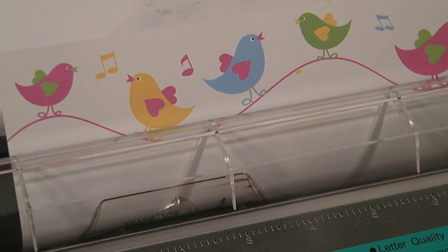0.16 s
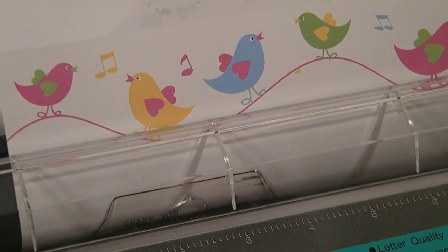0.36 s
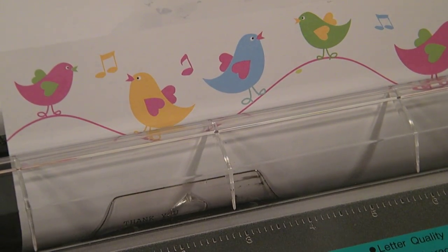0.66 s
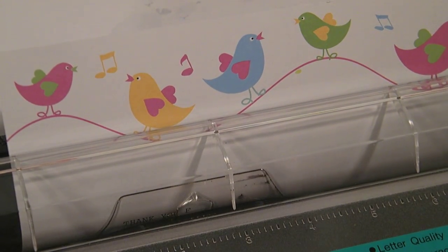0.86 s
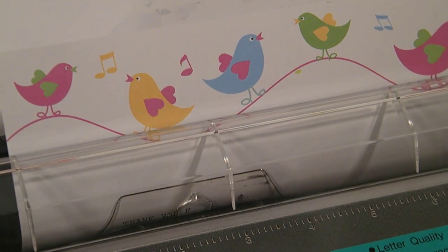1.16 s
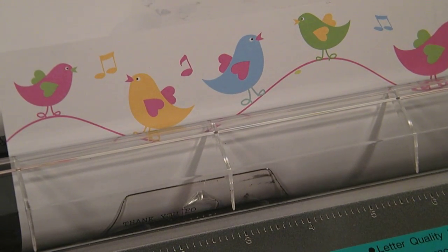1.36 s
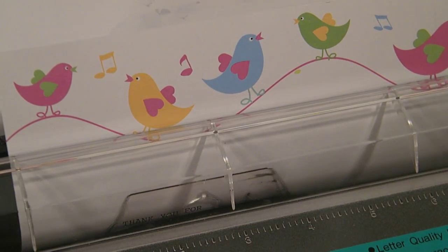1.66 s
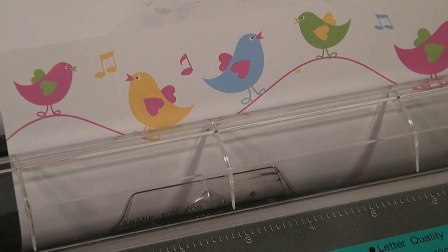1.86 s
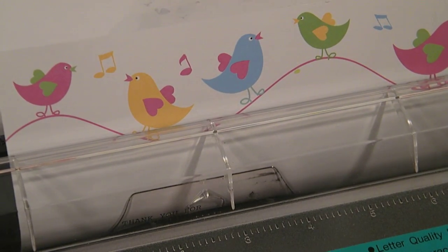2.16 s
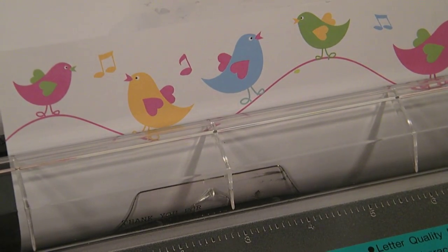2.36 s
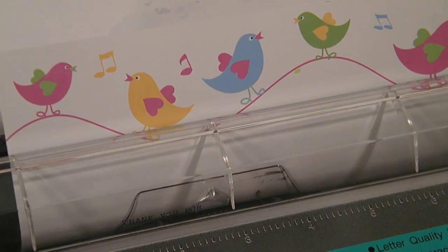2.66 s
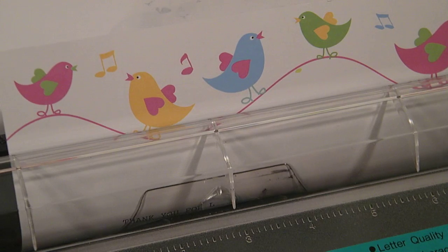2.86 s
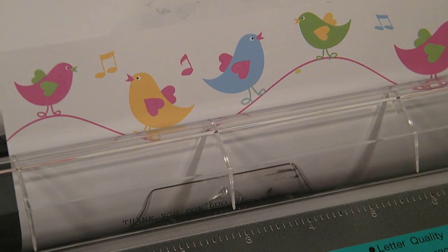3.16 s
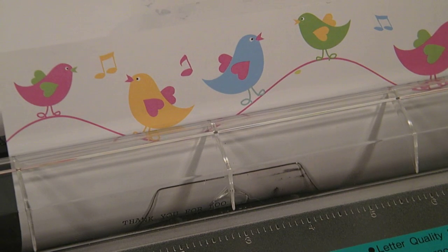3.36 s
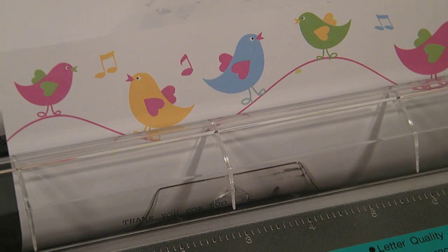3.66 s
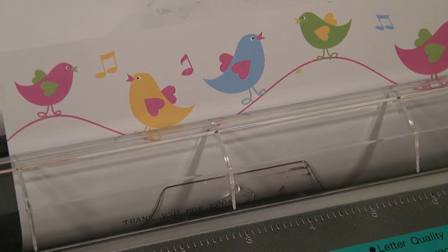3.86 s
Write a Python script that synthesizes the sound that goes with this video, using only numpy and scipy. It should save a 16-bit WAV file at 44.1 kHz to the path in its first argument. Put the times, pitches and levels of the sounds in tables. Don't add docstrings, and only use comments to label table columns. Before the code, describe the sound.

Typewriter keys clack one by one, each answered by a whir and a hard, rattling strike

```python
import sys
import numpy as np
from scipy import signal
from scipy.fft import rfft, irfft
from scipy.io import wavfile
from scipy.ndimage import uniform_filter1d

SR = 44100
rng = np.random.default_rng(int(sys.argv[2]) if len(sys.argv) > 2 else 0)


def makeup_ratio(level_db):
    decades = np.asarray(level_db, float) / 20
    return 10 ** decades


def digitize_waveform(pressure):
    field = np.atleast_2d(pressure).T
    bounded = np.clip(field, -1, 1)
    quanta = np.round(bounded * 32767).astype(np.int16)
    wavfile.write(sys.argv[1], SR, quanta)


N = 176400

# frequency in Hz, level in dB per Hz.
RUMBLE_SPECTRUM = [(30, -15.5), (60, 0), (114, -19), (183, -9), (240, -11.5), (436, -16), (1210, -27),
                   (1500, -61)]
# frequency in Hz, level in dB per Hz.
HISS_SPECTRUM = [(590, -13), (1000, 1.5), (4760, -7.5), (6020, 1), (7350, -8), (7970, -8), (8550, -19),
                 (15700, -27), (15900, -45.5)]
# frequency in Hz, level in dB, flutter in dB.
COIL_WHINE = [(7732, -57.5, .5), (15466, -87, 2.5), (15735, -85, 2.5)]
# time in seconds, level in dB.
HUM_LEVEL = [
    (0, -49.5),
    (1.948, -68),
    (2.05, -50.5),
    (3.0, -49),
    (3.55, -45),
    (3.8, -51),
    (4, -59),
]
# start in seconds, length in seconds, top in Hz, fall in Hz, level in dB.
BIRD_WHISTLES = [
    (.46, 0.11, 10400, 1300, -73),
    (0.554, 0.034, 9100, 200, -66),
    (1.996, 0.13, 9650, 1300, -70),
    (2.122, 0.044, 9220, 97.4, -65),
    (2.137, 0.19, 8950, 460, -62),
    (2.396, .17, 9040, 1130, -63),
]
RUMBLE_DB, HISS_DB, HUM_HZ = -47, -56, 88.7
ROOM_T60_S, ROOM_WET_DB, WALL_CUT_HZ = .3, -24, 7000

# start in seconds, level in dB.
LINKAGE_SCRAPES = [
    (0.413, -33),
    (2.39, -34),
]

# motor start in seconds, level in dB.
CARRIAGE_STEPS = [(0.017, -41.5), (0.266, -40.5), (0.352, -35), (0.886, -39.5), (1.313, -41.5),
                  (1.747, -41), (2.34, -33), (2.901, -41.5), (3.106, -40.5), (3.267, -40), (3.8, -40)]
# frequency in Hz, level in dB, delay in seconds, attack in seconds, hold in seconds, T60 in seconds.
FRAME_MODES = [(383.6, 3, 0.0018, 0.0009, 0.027, 0.15), (717, -3.5, 0.00087, 0.0017, 0.032, 0.028),
               (649, -3.5, 0, 0.0022, 0.029, 0.27), (147, -1, 0.00022, 0.012, 0.027, 0.38),
               (56.4, -3, 0.011, 0.031, 0.043, 0.092)]

# start in seconds, length in seconds, level in dB.
WHEEL_TURNS = [(-.02, 0.019, -32), (0.127, 0.073, -28), (0.672, 0.075, -29), (1.149, 0.065, -25.5),
               (1.608, 0.071, -25.5), (2.37, 0.028, -30), (2.739, 0.07, -25.5), (2.987, 0.091, -27.5),
               (3.143, 0.15, -31), (3.648, 0.066, -24.5), (3.858, 0.069, -26.5)]
# start in seconds, level in dB.
TOOTH_CATCHES = [(0.1333, -19.5), (0.1486, -27), (0.156, -19), (0.166, -23), (0.1775, -24), (0.19, -19),
                 (0.686, -20), (0.6923, -18.5), (0.7016, -23), (0.7156, -20.0), (0.727, -22.0),
                 (0.735, -22.5), (1.1544, -37), (1.1668, -33), (1.1754, -36), (1.19, -27.5), (1.2017, -22),
                 (1.21, -28), (1.617, -29), (1.6313, -28), (1.6421, -22), (1.655, -27), (1.664, -33),
                 (1.6743, -25.0), (2.748, -23.5), (2.7607, -28), (2.7715, -23), (2.7845, -21),
                 (2.794, -16.5), (2.801, -19), (2.9946, -28), (3.005, -18.5), (3.0099, -19.0), (3.021, -20),
                 (3.03, -31), (3.045, -26), (3.157, -21), (3.167, -26), (3.179, -28), (3.19, -22.0),
                 (3.2023, -17.5), (3.6488, -18.5), (3.6722, -15.5), (3.6876, -23), (3.6946, -25),
                 (3.7015, -26), (3.862, -27), (3.8791, -24), (3.8894, -23.5), (3.9035, -28), (3.9228, -32)]
# frequency in Hz, level in dB per Hz.
WHIR_SPECTRUM = [(730, -0.5), (1150, -15.5), (4400, -7.5), (5400, 0.5), (6800, 2), (8500, -7), (12000, -20),
                 (15500, -29), (16600, -48)]

# start in seconds, peak in dB.
KEY_TICKS = [(0.0044, -41), (0.095, -7), (0.3325, -4), (0.4, -17.5), (0.418, -15), (0.43, -16),
             (0.6447, -5.5), (1.1232, -14.5), (1.584, -8), (2.3013, -3.5), (2.3655, -21), (2.3981, -17.5),
             (2.7144, -17), (2.9512, -14.5), (3.6194, -10)]
# frequency in Hz, level in dB per Hz.
TICK_SPECTRUM = [(410, -68), (700, -32), (1770, -5), (3240, -10.5), (3800, -12), (4580, -4), (5960, 7),
                 (14500, -33), (16500, -89)]
# start in seconds, peak in dB, darkness in dB per octave, desk level in dB.
KEY_PRESSES = [
    (0.106, -16.5, -8, -15),
    (0.3399, -4, -10, 0.5),
    (0.6513, -15, 17, -6.5),
    (1.1300, -7, -15, -8),
    (1.5933, -13.5, 16, -21),
    (2.3127, -6.5, 14, 2),
    (2.7244, -12.5, 7, -8),
    (2.9646, -17, 5, -2),
    (3.6282, -14.5, 1, 2),
]
# start in seconds, peak in dB, darkness in dB per octave.
KEY_RETURNS = [(.0953, -16, 8), (0.1666, -15.5, -18), (0.4102, -10, -14), (0.513, -40, -2),
               (.6462, -15.5, 10), (0.7118, -20, 7), (1.1245, -11.5, 3), (1.1985, -14.5, 8),
               (1.5848, -23, 17), (1.648, -19, 10), (2.3892, -10.5, -4), (2.513, -39.5, 0),
               (2.794, -16, -10), (3.0335, -17.5, -13), (3.1568, -13.5, -3), (3.511, -36.5, 0),
               (3.703, -17.5, -1), (3.836, -22.5, -2), (3.9, -19, 7)]
# frequency in Hz, level in dB per Hz.
PRESS_SPECTRUM = [(180, -24), (300, -4), (1660, -2), (3650, 3.5), (4610, -5), (5930, 6), (12400, -31),
                  (14900, -26), (16500, -51)]
# frequency in Hz, level in dB per Hz.
RETURN_SPECTRUM = [(400, -15), (1300, -17.5), (1700, -3.5), (2600, -7), (4600, -7), (6000, -3.5),
                   (12000, -35.5), (16500, -32)]
# frequency in Hz, level in dB, T60 in seconds.
KEY_BODY_MODES = [(1620, 2, 0.038), (1825, 3.5, 0.034), (2505, 5, 0.041), (3040, -13.5, 0.01)]
# frequency in Hz, level in dB, T60 in seconds.
DESK_BODY_MODES = [(141, -20, 0.21), (826, -4, 0.077), (917, -11, 0.085), (252.5, -11.5, 0.16)]

# start in seconds, peak in dB.
HAMMER_BLOWS = [(.2224, 0), (.8386, 0), (1.2656, 0), (1.6995, 0), (2.8569, 0), (3.0611, -1), (3.2173, 0),
                (3.7477, 0), (3.9486, -1)]
# start in seconds, peak in dB.
BLOW_BEFORE_START = (-0.035, 1)
# delay in seconds, level in dB, hold in seconds.
HAMMER_REBOUNDS = [
    (-.004, -23, 0.0076),
    (.0042, -18, .001),
    (.0062, -7, 0.0018),
    (.009, -5, 0.0011),
    (.012, -5, .001),
    (0.016, -10, .001),
]
# delay in seconds, level in dB, hold in seconds, frequency in Hz.
ARM_PINGS = [(.0008, -12, 0.00079, 3900), (.0032, -13, .0009, 6500), (.0052, -11, .0004, 4400),
             (.006, -9.5, 0.00086, 6800), (.0079, -13.5, .001, 6100), (.011, -15.5, .0008, 6700),
             (.012, -20.5, .001, 4100), (0.018, -24, .001, 4100)]
# frequency in Hz, level in dB per Hz.
CRACK_SPECTRUM = [(500, -50), (2650, -6), (4000, 5.5), (5120, 4.5), (6560, 0), (10500, -5.5), (15500, -32),
                  (16800, -74)]
# frequency in Hz, level in dB per Hz.
RATTLE_SPECTRUM = [(300, -10.5), (2100, -12.5), (4300, -8), (6340, 1), (7500, -9.5), (10500, -30),
                   (16000, -40), (16800, -75)]
# frequency in Hz, level in dB, T60 in seconds.
HAMMER_ARM_MODES = [(4240, -2.5, 0.12), (5100, -2, 0.12), (6080, -7, 0.095), (6600, 3, .12),
                    (6620, -2.5, 0.12)]
BLOW_ATTACK_S, BLOW_HOLD_S, BLOW_T60_S = .0012, .0017, .0025
BLOW_HZ, BLOW_SAG_HZ_PER_S = 6500, 5.8e5
RATTLE_DB, RATTLE_SAG_T60_S, RATTLE_HOLD_S, RATTLE_T60_S = -20.5, 0.36, 0.061, 0.27

NOTCH_HZ, NOTCH_WIDTH_HZ, NOTCH_DEPTH = 4830, 340, .97
OVERLOAD_TOP, OVERLOAD_KNEE, CUT_HZ = .61, 8, 16300


def rms_one(x):
    return x / np.sqrt(np.mean(x ** 2) + 1e-20)


def wander(width):
    return uniform_filter1d(rng.standard_normal(N), size=width)


def colour(x, spectrum, size=4096):
    hz, db = np.transpose(spectrum)
    f = np.maximum(np.arange(size // 2 + 1) * SR / size, 10)
    level_db = np.interp(np.log(f), np.log(hz), db)
    level_db = level_db - 36 * np.maximum(np.log2(hz[0] / f), 0)
    ceps = irfft(level_db * np.log(10) / 20)
    ceps[1:size // 2] *= 2
    ceps[size // 2 + 1:] = 0
    h = irfft(np.exp(rfft(ceps)))
    return signal.fftconvolve(x, h / np.sqrt(np.sum(h ** 2)))[:N]


def shape(s, db, attack_s, hold_s, t60_s, sag_t60_s=99.):
    power = np.zeros(N)
    for start, level_db, stay in np.broadcast(s, db, hold_s):
        end = start + attack_s + stay + 2 * t60_s
        i = np.arange(max(int(start * SR), 0), min(int(end * SR), N))
        t = i / SR - start
        fall_db = -60 * (t / sag_t60_s + np.maximum(t - attack_s - stay, 0) / t60_s)
        power[i] += (np.clip(t / attack_s, 0, 1) * makeup_ratio(level_db + fall_db)) ** 2
    return np.sqrt(power)


def grit(lumpy_db, lump_s):
    knots = rng.standard_normal(4000)
    place = np.arange(N) / SR / lump_s % 3999
    lumps_db = lumpy_db * np.interp(place, np.arange(4000), knots)
    return rms_one(rng.standard_normal(N) * makeup_ratio(lumps_db))


def ring(x, modes, shorten):
    out = 0
    for k, (hz, db, t60_s) in enumerate(modes):
        r = makeup_ratio(-60 / (min(t60_s, .2) * shorten * SR))
        w = 2 * np.pi * hz / SR
        mode = signal.lfilter([0, np.sin(w)], [1, -2 * r * np.cos(w), r * r], x + 1e-18)
        out = out + (-1) ** k * makeup_ratio(db) * mode
    return out


def struck(s, db, dark_db, modes):
    vary = rng.standard_normal((len(s), len(modes), 2))
    out = 0
    for k, mode in enumerate(modes):
        clicks = np.zeros(N)
        level_db = db + dark_db * np.log2(2100 / mode[0])
        second_s = s + .0024 + .0005 * vary[:, k, 1]
        clicks[(s * SR).astype(int) + 20] = makeup_ratio(level_db + 1.7 * vary[:, k, 0])
        clicks[(second_s * SR).astype(int)] = makeup_ratio(level_db - 2)
        soft = signal.lfilter([.25], [1, -.75], clicks)
        out = out + ring(soft, [mode], 1)
    return out


def clacks(events, spectrum, modes, modes_db):
    s, db, dark_db = np.transpose(events)[:3]
    contact = shape(s, db, 0.00062, 0.00084, 0.034)
    settling = shape(s, db - 13.5, 0.0085, 0.012, 0.17)
    knock = (contact + settling) * grit(2.8, 0.001)
    return makeup_ratio(-7) * colour(knock, spectrum) + struck(s, db + modes_db, dark_db, modes)


def hum_and_whine():
    t = np.arange(N) / SR
    s, db = np.transpose(HUM_LEVEL)
    phase = 2 * np.pi * np.cumsum(HUM_HZ + 200 * wander(2000)) / SR
    out = np.sqrt(2) * makeup_ratio(np.interp(t, s, db)) * (np.sin(phase) + makeup_ratio(-4.5) * np.sin(2 * phase))
    for hz, db, flutter_db in COIL_WHINE:
        level = makeup_ratio(db + flutter_db * rms_one(wander(1500)))
        out += np.sqrt(2) * level * np.sin(2 * np.pi * hz * t)
    return out


def bird():
    t = np.arange(N) / SR
    out = np.zeros(N)
    for s, length_s, top_hz, fall_hz, db in BIRD_WHISTLES:
        u = np.clip((t - s) / length_s, 0, 1)
        pitch_hz = top_hz - fall_hz * (2 * u - 1) ** 2 + 400 * wander(200)
        swell = np.sqrt(np.sin(np.pi * u) + 1e-12) * (u < 1)
        flutter = np.abs(1 + 10 * wander(400))
        out += makeup_ratio(db) * swell * flutter * np.sin(2 * np.pi * np.cumsum(pitch_hz) / SR)
    return out


def background():
    rumble = makeup_ratio(RUMBLE_DB) * colour(grit(0.17, 0.15), [*RUMBLE_SPECTRUM, (3000, -70)])
    hiss = makeup_ratio(HISS_DB) * colour(grit(1, .02), HISS_SPECTRUM)
    return rumble + hiss + hum_and_whine() + bird()


def room(x):
    t = np.arange(SR // 2) / SR
    tail = rng.standard_normal(len(t)) * makeup_ratio(-60 * t / ROOM_T60_S) * (t > .004)
    tail = signal.sosfilt(signal.butter(2, WALL_CUT_HZ, fs=SR, output="sos"), tail)
    return signal.fftconvolve(x, tail / np.sqrt(np.sum(tail ** 2)))[:N]


def linkage():
    s, db = np.transpose(LINKAGE_SCRAPES)
    scrape = shape(s, db, 0.0036, 0.021, 0.14) * grit(4.0, .003)
    return colour(scrape, [(150, 2), (260, -0.5), (900, -3), (1500, -20), (3000, -31)])


def carriage():
    s, db = np.transpose(CARRIAGE_STEPS)
    t = np.arange(N) / SR
    out = 0
    for hz, level_db, lag_s, attack_s, hold_s, t60_s in FRAME_MODES:
        waver = np.cumsum(wander(400)) * hz * 1.307 / SR
        level = shape(s + lag_s, db + level_db, attack_s, hold_s, t60_s)
        out = out + np.sqrt(2) * level * np.sin(2 * np.pi * (hz * t + waver))
    grind = shape(s, db - 0.5, 0.011, 0.039, 0.072) * grit(0.83, 0.0041)
    return out + colour(grind, [(200, 16.0), (700, 4.0), (1500, 8), (3000, -7), (8000, -72.0)])


def wheel():
    s, length_s, db = np.transpose(WHEEL_TURNS)
    turning = shape(s, db - 5, 0.0019, length_s, 0.045) + shape(s, db - 5.0, 0.0096, length_s / 3, 0.12)
    catch_s, catch_db = np.transpose(TOOTH_CATCHES)
    catches = shape(catch_s, catch_db - 3.5, 0.00027, 0.001, 0.026)
    whir = np.hypot(turning * makeup_ratio(-1.0), catches) * grit(2.2, 0.00098)
    drive = shape(s - .006, db, 0.0048, length_s / 2, 0.56) * rng.standard_normal(N)
    buzz = ring(drive, [(404.6, 3.5, 0.12), (148, -1, 0.32)], 0.49)
    return colour(whir, WHIR_SPECTRUM) + makeup_ratio(-36.5) * buzz


def keys():
    s, db = np.transpose(KEY_TICKS)
    tick = shape(s, db, 0.00095, 0.00058, 0.02) + shape(s, db - 22.0, 0.0014, 0.0022, 0.17)
    tick = tick * grit(0.65, 0.00091)
    s, db, _, desk_db = np.transpose(KEY_PRESSES)
    desk = struck(s + 0.00292, db + desk_db - 13.5, 0, DESK_BODY_MODES)
    desk = uniform_filter1d(desk, size=12)
    presses = clacks(KEY_PRESSES, PRESS_SPECTRUM, KEY_BODY_MODES, modes_db=-15)
    returns = clacks(KEY_RETURNS, RETURN_SPECTRUM, KEY_BODY_MODES, modes_db=-12.5)
    return makeup_ratio(-4.5) * colour(tick, TICK_SPECTRUM) + presses + returns + desk


def hammer():
    s, db = np.transpose([BLOW_BEFORE_START, *HAMMER_BLOWS])
    t = np.arange(N) / SR
    since_s = t - s[np.searchsorted(s, t) - 1]
    blow = shape(s, db, BLOW_ATTACK_S, BLOW_HOLD_S, BLOW_T60_S)
    ping = blow * np.sin(2 * np.pi * since_s * (BLOW_HZ - BLOW_SAG_HZ_PER_S * since_s / 2))
    for lag_s, loss_db, hold_s, hz in ARM_PINGS:
        vary = rng.standard_normal((len(s), 2))
        start_s = s + lag_s + 0.0001 * vary[:, 0]
        level = shape(start_s, db + loss_db + 1.9 * vary[:, 1], 0.0004, hold_s, 0.0037)
        ping += level * np.sin(2 * np.pi * hz * since_s)
    crack = shape(s, db, BLOW_ATTACK_S, .0012, .005) * rng.choice([-1, 1], N)
    hits = [shape(s + lag_s, db + loss_db, 0.0013, hold_s, 0.0025)
            for lag_s, loss_db, hold_s in HAMMER_REBOUNDS]
    rebounds = np.sqrt(np.sum(np.square(hits), axis=0)) * rng.standard_normal(N)
    rattle = shape(s, db + RATTLE_DB, 0.012, RATTLE_HOLD_S, RATTLE_T60_S, RATTLE_SAG_T60_S)
    rattle = rattle * grit(1.6, 0.003)
    arm = makeup_ratio(-37.5) * ring(rattle, HAMMER_ARM_MODES, 1)
    loose = colour(rattle + makeup_ratio(-14) * rebounds, RATTLE_SPECTRUM)
    return makeup_ratio(2) * ping + makeup_ratio(-4) * colour(crack, CRACK_SPECTRUM) + loose + arm


def scene():
    machine = linkage() + carriage() + wheel() + keys() + hammer()
    return (background() + machine + makeup_ratio(ROOM_WET_DB) * room(machine))[None]


def roll_off(x):
    return signal.sosfilt(signal.butter(12, 17020, fs=SR, output="sos"), x)


def record(dry):
    b, a = signal.iirpeak(NOTCH_HZ, NOTCH_HZ / NOTCH_WIDTH_HZ, fs=SR)
    x = dry - NOTCH_DEPTH * signal.lfilter(b, a, dry)
    x = x / (1 + np.abs(x / OVERLOAD_TOP) ** OVERLOAD_KNEE) ** (1 / OVERLOAD_KNEE)
    x = signal.sosfilt(signal.cheby2(10, 50, CUT_HZ + 700, fs=SR, output="sos"), x)
    return roll_off(x)


dry = scene()
out = record(dry)
digitize_waveform(out)
```